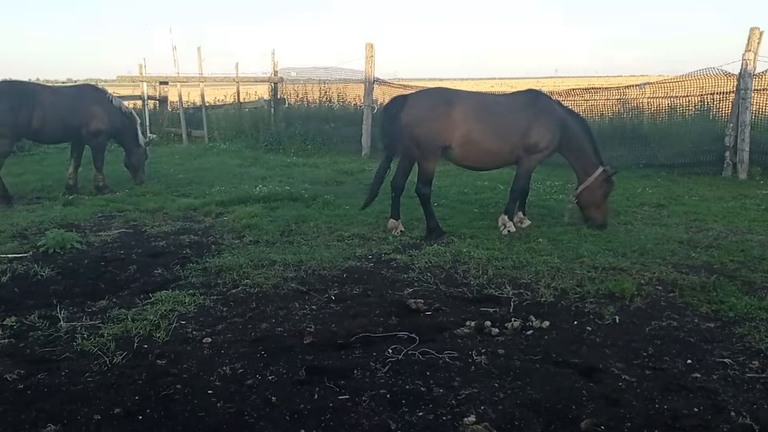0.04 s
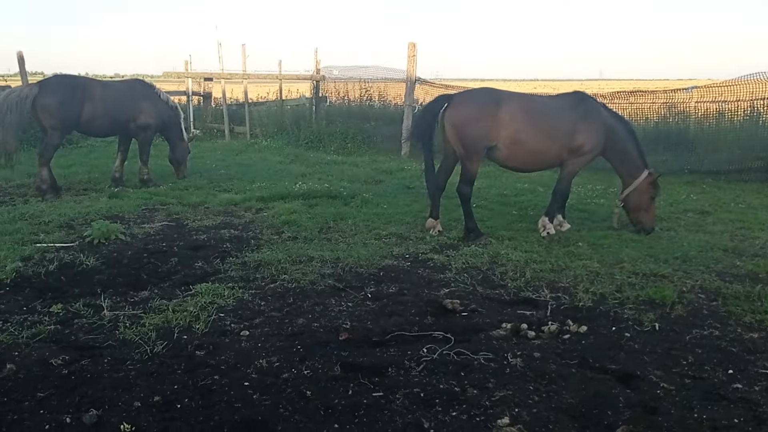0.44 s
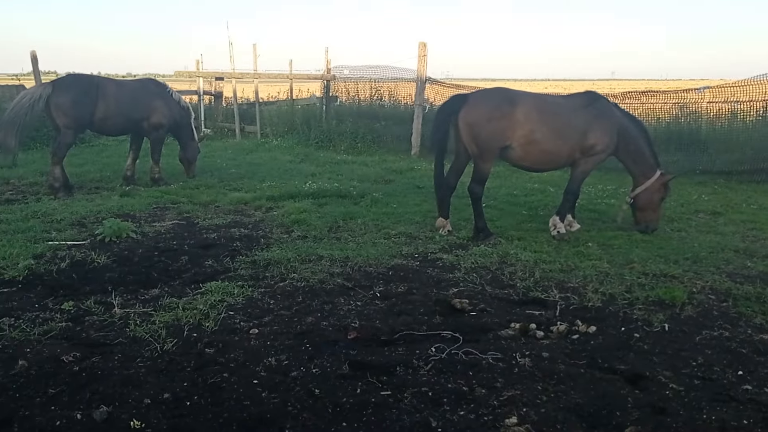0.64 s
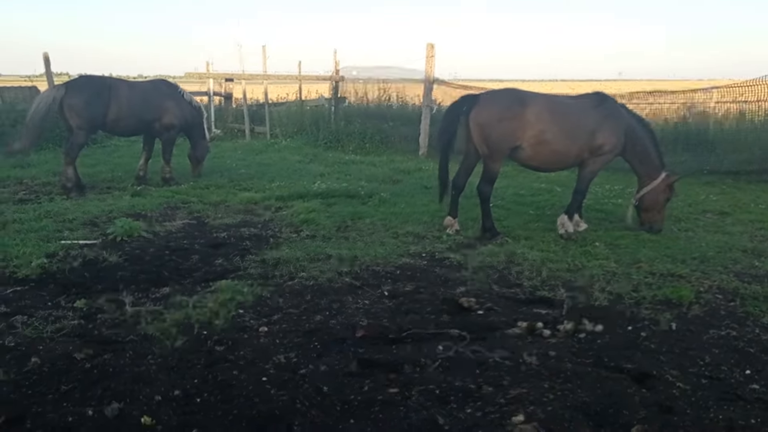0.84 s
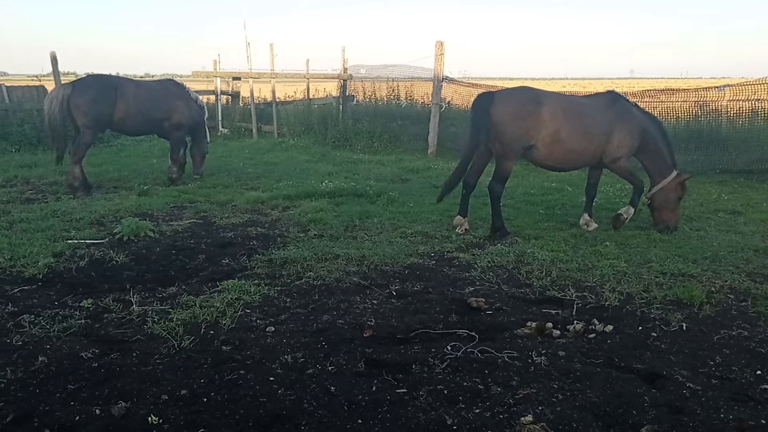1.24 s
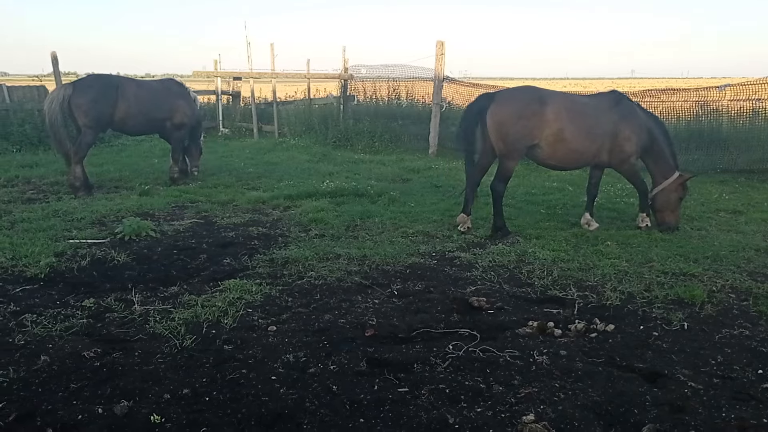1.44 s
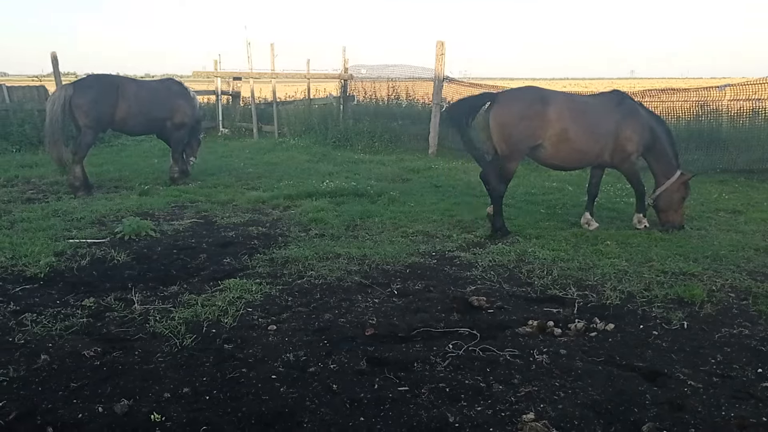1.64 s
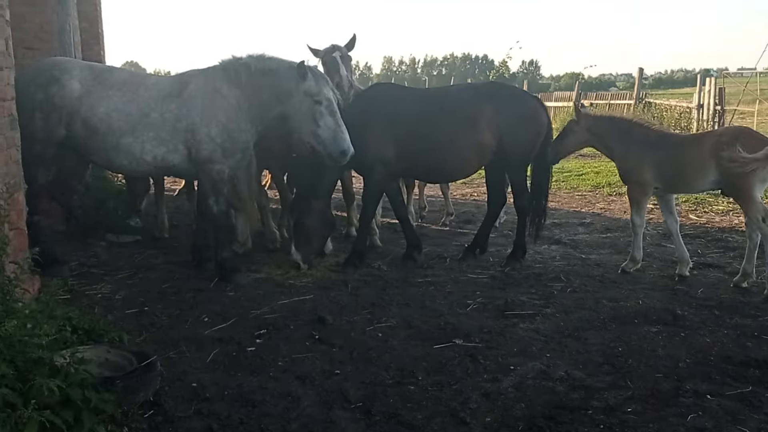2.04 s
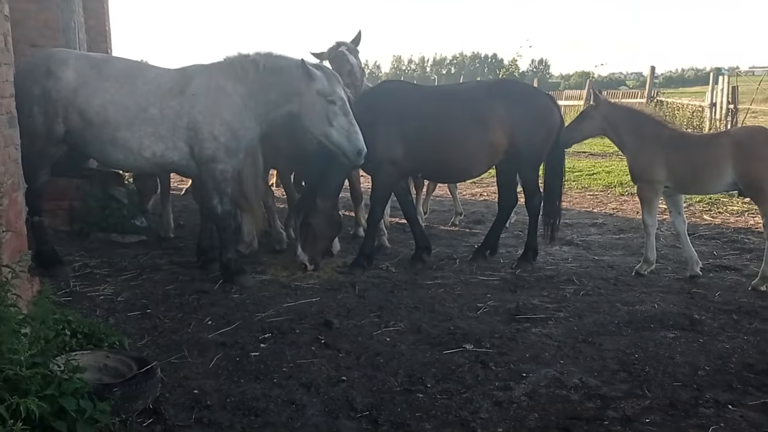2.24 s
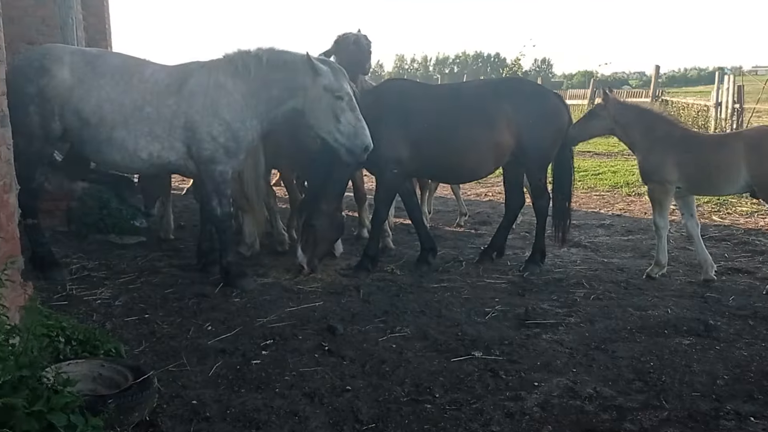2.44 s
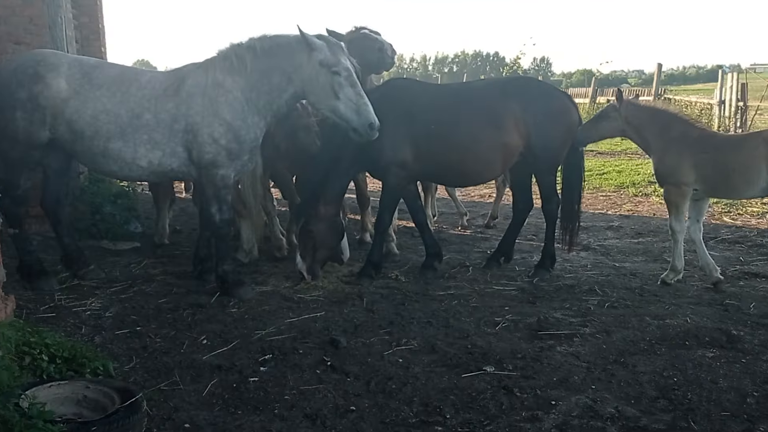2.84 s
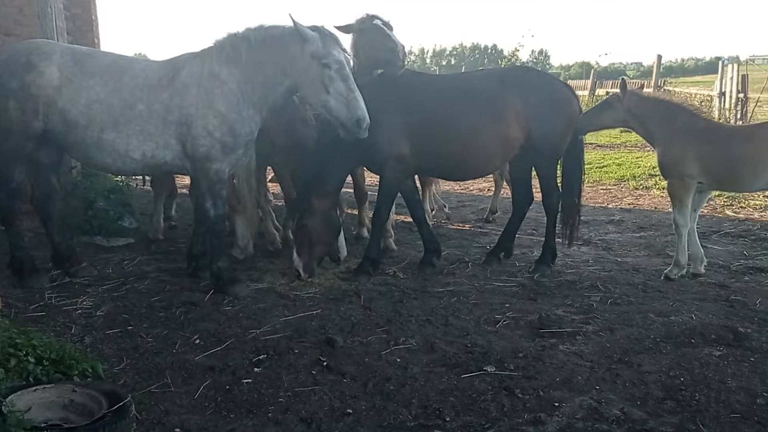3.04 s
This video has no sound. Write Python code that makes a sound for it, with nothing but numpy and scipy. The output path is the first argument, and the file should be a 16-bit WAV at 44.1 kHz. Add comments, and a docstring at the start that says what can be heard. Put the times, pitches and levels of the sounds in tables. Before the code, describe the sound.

A horse blows through its nose and gives one rough, fluttering snort close by in a yard. Before it come a few dry clicks, a small bird chirp and wind buffeting the microphone; afterwards a hoof thuds softly.

```python
"""A small bird chirps and dry clicks sound close by in a pasture, while wind buffets the microphone.
After a short silence, a horse in a yard blows through its nose and breaks into a rough snort:
the nostrils act as a valve that flutters ever more slowly, chopping the turbulent breath into
puffs that excite the resonances of the nose. Then straw rustles and a hoof thuds on soft earth."""
import sys
import numpy as np
from scipy import signal
from scipy.fft import rfft, irfft, next_fast_len
from scipy.io import wavfile
from scipy.ndimage import uniform_filter1d, map_coordinates

SR = 44100
rng = np.random.default_rng(int(sys.argv[2]) if len(sys.argv) > 2 else 0)


def put_to_file(sound):
    """Save the sound as 16-bit audio at rate SR, in the file named by the first command-line argument."""
    columns = np.atleast_2d(sound).T  # one column per channel
    safe = np.clip(columns, -1, 1)
    whole_steps = np.round(safe * 32767)
    wavfile.write(sys.argv[1], SR, whole_steps.astype(np.int16))


N = 136710
T = np.arange(N) / SR
PASTURE_END_S, YARD_START_S = 1.668, 1.770

# Flutter of the nostrils (time [s], flap rate [Hz])
FLAP_RATE = [(2.03, 24.6), (2.08, 23.94), (2.16, 21.8), (2.3, 21.07), (2.4, 18.4), (2.47, 15.3)]
# Envelopes of the nasal resonances, the hiss and the low flutter (time [s], level [dB])
NASAL_LEVEL = [(1.95, -67), (1.99, -51), (2.01, -41), (2.12, -37), (2.22, -41.5), (2.33, -45.5),
               (2.41, -43.5), (2.47, -53), (2.503, -53.5), (2.53, -60.5), (2.59, -84)]
HISS_LEVEL = [(1.97, -83), (2.01, -51.5), (2.18, -49.5), (2.39, -51), (2.44, -53.5), (2.47, -60),
              (2.498, -56), (2.52, -66), (2.58, -84.5)]
HEAD_LEVEL = [(1.97, -67), (2.01, -41.5), (2.12, -39.5), (2.28, -38), (2.4, -41.5), (2.47, -47),
              (2.508, -43), (2.535, -79), (2.56, -90)]
# Resonances of the nose, its narrow slit and its wet lips (frequency [Hz], bandwidth [Hz], gain [dB])
NOSE_MODES = [(577, 50, 1.5), (679, 97, 0), (806, 63, -3), (1042, 66, -10.5), (1387, 63, -17),
              (1760, 53, -24.5)]
SLIT_MODES = [(3310, 250, 1), (4630, 310, -5), (6120, 210, 0), (6460, 400, -7.5)]
LIP_MODES = [(1826, 620, -7), (2500, 360, -3), (3300, 410, -4.5)]
# Spectra of the hiss and of the deep chambers of the head (frequency [Hz], gain [dB])
HISS_SPECTRUM = [(880, -26), (1500, 1), (1640, -8.5), (1850, 0), (2190, -8.5), (2490, -1.5), (3090, -6),
                 (3350, -7), (4500, 1), (5330, -8), (6560, -0.5), (7170, -9), (8320, -12), (10900, -32),
                 (11900, -34), (13500, -53), (16000, -40)]
HEAD_SPECTRUM = [(30, -28), (60, -4), (95, -5.5), (135, 0.5), (185, -8), (255, -0.5), (300, -8.5),
                 (345, -22), (405, -12.5), (470, -16), (600, -26), (1200, -64)]


def snort():
    """Valve modulation of turbulent flow: each nostril flap lets out a long puff and a short rebound."""
    first_flap_s, rebound_phase = 2.012, 0.46
    cycles = np.cumsum(curve(FLAP_RATE)) / SR
    cycles -= np.interp(first_flap_s, T, cycles)
    # At first the strong blow holds the nostrils partly open.
    leak = 0.56 * np.exp(-np.maximum(T - first_flap_s, 0) / 0.13)

    def puff(phase, width):
        """A Gaussian pulse on every flap; phase and width in cycles."""
        return np.exp(-.5 * (((cycles - phase + .5) % 1 - .5) / width) ** 2)

    def ragged(flow, depth_db):
        """Flow plus leak under random amplitude modulation, at rms 1."""
        return unit((unit(flow) + leak) / (1 + leak) * amp(depth_db * wobble(330)))

    opening = puff(0, width=0.17)
    rebound = amp(-6) * puff(rebound_phase, width=0.081)
    # The resonances rise as the nostril opens and sag as it shuts.
    glide = .4 * puff(-.08, width=.15) - .18 * puff(.17, width=.1)
    nasal = bent(steadied(resonate(noise(), NOSE_MODES), span_s=0.0046), glide)
    nasal *= ragged(.45 + 0.64 * opening + rebound, depth_db=2.5)
    nasal = highpass(nasal, hz=443, order=8)

    hiss = patchy(coloured(noise(), HISS_SPECTRUM), depth_db=3.5)
    hiss *= ragged(0.37 + opening + .3 * rebound, depth_db=3.5)
    droplets = noise() * (rng.random(N) < 210 / SR)  # about 210 a second
    spit = coloured(droplets, HISS_SPECTRUM) * unit(opening + rebound)

    # A slit whistles as the nostril parts and again on the rebound.
    slit = 0.11 + puff(-0.093, width=0.054) + amp(0.5) * puff(rebound_phase, width=0.054)
    whistle = bent(resonate(noise(), SLIT_MODES), octaves=0.033 * wobble(60))
    whistle = lowpass(whistle * ragged(slit, depth_db=1), hz=7800, order=10)
    splutter = bent(resonate(noise(), LIP_MODES), octaves=.4 * glide)
    splutter *= ragged(0.16 + puff(0.13, width=0.12), depth_db=2)
    treble = hiss + amp(-8) * spit + amp(-4) * whistle + amp(-5) * splutter

    head = steadied(coloured(noise(), HEAD_SPECTRUM), span_s=0.019)
    head *= unit(0.78 + leak + opening + .5 * rebound)
    # Each of eleven flaps adds a slap: one brief push of air.
    flap_times = np.interp(np.arange(11), cycles, T)[:, None]
    slap_lag_s, slap_width_s = 0.00543, .0016
    offset = (T - flap_times - slap_lag_s) / slap_width_s
    slaps = ((offset ** 2 - 1) * np.exp(-.5 * offset ** 2)).sum(axis=0) / (1 + leak)
    bass = head + amp(11) * slaps
    return level(NASAL_LEVEL) * nasal + level(HISS_LEVEL) * treble + level(HEAD_LEVEL) * bass


# Envelopes of the smooth breath and of its hollow hum (time [s], level [dB])
BREATH_LEVEL = [(1.845, -90), (1.872, -52), (1.9, -56.5), (1.932, -62), (1.96, -55), (2.0, -54.5),
                (2.04, -84)]
HUM_LEVEL = [(1.866, -71), (1.88, -45.5), (1.925, -47.5), (1.96, -45), (2.0, -51), (2.03, -86)]
# Resonances of the open nose (frequency [Hz], bandwidth [Hz], gain [dB])
OPEN_NOSE_MODES = [(593, 120, -6), (883, 77, -2.5), (1008, 45, 1.5), (1630, 80, -13), (1873, 22, -5),
                   (2810, 87, -11.5), (3644, 62, -7), (4320, 110, -11.5), (5420, 130, -27),
                   (5900, 39, -15.5), (7460, 80, -14.5)]
# Spectrum of the hum (frequency [Hz], gain [dB])
HUM_SPECTRUM = [(60, -37), (120, -7), (170, 1.5), (280, -1), (335, -27), (420, -16.5), (700, -69)]


def blow():
    """Source and filter: streaming air excites the wavering open nose just before the flutter."""
    air = lowpass(noise(), hz=8500, order=8)
    stream = bent(resonate(air, OPEN_NOSE_MODES), octaves=0.039 * wobble(25))
    stream = patchy(stream, depth_db=3)
    hum = steadied(coloured(noise(), HUM_SPECTRUM), span_s=0.026)
    return level(BREATH_LEVEL) * stream + level(HUM_LEVEL) * hum


# Spectrum of a hoof on soft earth (frequency [Hz], gain [dB])
THUD_SPECTRUM = [(29, -40), (50, -9), (130, 2.5), (273, -15), (404, -21.5), (749, -25), (844, -35),
                 (1020, -29), (3000, -75), (3900, -86), (6600, -120)]


def hoof():
    """Damped impact: soft earth gives a dull thud with a gradual attack and an exponential decay."""
    step_s, attack_s, t60_s = 2.781, 0.011, 0.13
    age = np.maximum(T - step_s, 0)
    envelope = amp(-30.5 - 60 * age / t60_s) * (1 - np.exp(-age / attack_s))
    return envelope * steadied(coloured(noise(), THUD_SPECTRUM), span_s=0.017)


# Dry snaps (time [s], relative level [dB], high-pass cutoff [Hz], 60 dB decay time of the crackle [s])
SNAPS = [(0.1475, -38.5, 3000, 0.0061), (0.215, -25.5, 5600, 0.0053), (0.2336, -18, 244, 0.0013),
         (.480, -24, 4060, 0.009), (1.029, -66, 2530, .012), (1.599, -61, 3000, 0.054)]
# Modes of a small hard body (frequency [Hz], bandwidth [Hz], gain [dB])
HARD_BODY_MODES = [(422, 68, 7.5), (1000, 260, -5.5), (2110, 560, -2.5), (2693, 280, 2), (4700, 1300, -11),
                   (6070, 530, -3), (7710, 1300, -15), (12000, 2200, -28.5), (15400, 900, -18.5)]


def clicks():
    """Impulse excitation: each snap and its brief crackle ring the same small hard body."""
    taps = np.zeros(N)
    for start, db, cutoff_hz, t60 in SNAPS:
        snap = amp(-30.5 - 60 * np.abs(T - start) / t60) * noise() * (T >= start)
        snap[round(start * SR)] = 1  # the impulse ahead of the crackle
        low_cut = signal.butter(2, cutoff_hz, "high", fs=SR, output="sos")
        taps += amp(db) * signal.sosfilt(low_cut, snap)
    return amp(-1) * np.std(taps) * resonate(taps, HARD_BODY_MODES)


# Bird notes (time [s], duration [s], start frequency [Hz], end frequency [Hz], level [dB])
BIRD_NOTES = [(0.113, .02, 6030, 6100, -65.5), (0.174, 0.062, 6860, 4290, -51),
              (1.3, 0.11, 1977, 1965, -79.5)]


def bird():
    """Frequency modulation of a pure tone: thin whistles, the loudest falling ever faster."""
    out = np.zeros(N)
    for start, duration, start_hz, end_hz, db in BIRD_NOTES:
        progress = np.clip((T - start) / duration, 0, 1)
        hz = start_hz + (end_hz - start_hz) * progress ** 1.35
        hz *= 1 + 0.016 * wobble(500)
        envelope = amp(db + 2 * wobble(200)) * np.abs(np.sin(np.pi * progress)) ** 0.42
        out += envelope * np.sin(2 * np.pi * np.cumsum(hz) / SR)
    return out


# Swishes of grass and straw (time [s], duration [s], level [dB], centre frequency [Hz])
SWISHES = [(0.207, 0.047, -63, 4470), (.57, 0.27, -83.5, 5500), (0.986, 0.087, -83, 4460),
           (1.164, 0.077, -81.5, 4660), (1.535, .014, -72.5, 6000), (1.592, 0.02, -58.5, 1700),
           (1.594, 0.013, -64.5, 6000), (1.791, 0.054, -62, 800), (2.612, .05, -68, 5580),
           (2.642, 0.18, -68, 4140), (2.911, 0.11, -78.5, 6170), (2.907, 0.064, -69.5, 456),
           (3.033, 0.012, -74.5, 7000)]


def rustles():
    """Friction noise: grass and straw give grainy, band-limited swells as the horses shift."""
    out = np.zeros(N)
    for start, duration, db, hz in SWISHES:
        spectrum = [(hz / 8, -18), (hz / 2, -5), (hz, 0), (hz * 1.57, -5), (hz * 2.24, -24), (hz * 4, -40)]
        progress = np.clip((T - start) / duration, 0, 1)
        swell = np.abs(np.sin(np.pi * progress)) ** 0.53
        grains = noise() * amp(1.95 * wobble(300))
        out += amp(db) * swell * coloured(grains, spectrum)
    return np.std(out) * patchy(out, depth_db=4.5)


# Gusts in each place (time [s], level [dB])
PASTURE_GUSTS = [(0, -57.5), (.06, -68.5), (.16, -65), (.26, -50), (.43, -51), (.53, -37.5), (.6, -35),
                 (.7, -38), (.77, -45), (.82, -39.5), (.88, -50), (.98, -42), (1.13, -39), (1.2, -58.5),
                 (1.25, -48), (1.32, -58.5), (1.365, -41.5), (1.41, -57), (1.53, -40), (1.57, -51.5),
                 (1.61, -40), (1.66, -44.5)]
YARD_GUSTS = [(1.77, -46.5), (1.85, -66.5), (2.55, -63), (2.63, -56), (2.69, -65), (2.87, -64.5),
              (3.1, -66.5)]
# Spectra of the buffeting and of each place's hush (frequency [Hz], gain [dB])
BUFFET_SPECTRUM = [(15, -49.5), (25, -25), (66, 2.5), (118, 5), (179, -2.5), (230, -7.5), (325, -23.5),
                   (367, -26), (479, -42), (600, -58.5), (780, -78.5), (1320, -120)]
PASTURE_HUSH = [(290, -8.5), (500, -5.5), (900, -5.5), (1900, -11.5), (2200, -19.5), (4400, -22),
                (7000, -26.5), (9600, -41.5), (13500, -45.5), (15200, -29.5), (16000, -32)]
YARD_HUSH = [(180, -32), (300, -4.5), (398, -7.5), (749, -8), (1250, -15), (1360, -15), (3640, -26.5),
             (4990, -30), (7440, -29), (11900, -61), (16000, -40.5)]


def wind():
    """Turbulent pressure on the microphone: lumpy low buffeting over the faint hush of each place."""
    in_pasture = T < PASTURE_END_S
    gust_db = np.where(in_pasture, curve(PASTURE_GUSTS), curve(YARD_GUSTS)) + wobble(60)
    buffet = amp(gust_db) * steadied(coloured(noise(), BUFFET_SPECTRUM), span_s=.045)
    pasture = amp(-74) * patchy(coloured(noise(), PASTURE_HUSH), depth_db=3.56)
    yard = amp(-69) * patchy(coloured(noise(), YARD_HUSH), depth_db=3.56)
    return buffet + np.where(in_pasture, pasture, yard) * amp(0.74 * wobble(16))


# Outdoor reverberation (frequency [Hz], 60 dB decay time [s])
REVERB_TIME = [(200, 0.14), (2000, 0.37), (10000, 0.19)]


def echo(x):
    """Diffuse reflection from sheds, fences and ground: each band decays exponentially."""
    hz, t, bands = signal.stft(rng.standard_normal(SR // 2), SR, nperseg=256)
    decay = amp(-60 * t / along(REVERB_TIME, hz)[:, None])
    tail = signal.istft(bands * decay, SR, nperseg=256)[1]
    return signal.fftconvolve(x, tail / np.linalg.norm(tail))[:N]


def amp(db):
    """Decibels to gain."""
    return 10 ** (np.asarray(db) / 20)


def unit(x):
    """Normalisation to rms 1."""
    return x / np.sqrt(np.mean(x ** 2) + 1e-20)


def along(points, hz):
    """Interpolation of (frequency [Hz], value) points on a logarithmic axis."""
    knots_hz, values = np.transpose(points)
    return np.interp(np.log(hz + 1), np.log(knots_hz + 1), values)


def curve(rows, outside=None):
    """Linear interpolation of (time [s], value) rows at every sample."""
    return np.interp(T, *np.transpose(rows), left=outside, right=outside)


def level(rows):
    """Gain envelope from (time [s], level [dB]) rows, silent outside them."""
    return amp(curve(rows, outside=-140))


def noise():
    """White Gaussian noise."""
    return rng.standard_normal(N)


def wobble(rate):
    """Smooth random modulation, rate knots a second."""
    return map_coordinates(rng.standard_normal(4000), [T * rate], mode="wrap")


def filtered(x, response):
    """Linear filtering: the spectrum of x times a frequency response."""
    size = next_fast_len(N + SR // 2)
    return irfft(rfft(x, size) * response(np.fft.rfftfreq(size, 1 / SR)), size)[:N]


def lowpass(x, hz, order):
    """Zero-phase roll-off above hz."""
    return filtered(x, lambda f: 1 / (1 + (f / hz) ** order))


def highpass(x, hz, order):
    """The complement of the low-pass."""
    return x - lowpass(x, hz, order)


def coloured(x, spectrum):
    """Spectral shaping by (frequency [Hz], gain [dB]) points, at rms 1."""
    return unit(filtered(x, lambda hz: amp(along(spectrum, hz))))


def resonate(x, modes):
    """Modal superposition: damped resonators in parallel with alternating signs, at rms 1."""
    def response(f):
        return sum((-1) ** k * amp(db) * 1j * f * width / (hz * hz - f * f + 1j * f * width)
                   for k, (hz, width, db) in enumerate(modes))
    return unit(filtered(x, response))


def steadied(x, span_s):
    """Division by the running rms evens out the slow chance swells of noise."""
    power = uniform_filter1d(x * x, max(8, int(span_s * SR)))
    return x / np.sqrt(np.abs(power) + 1e-6)


def patchy(x, depth_db):
    """Random gain in brief patches of time and frequency, at rms 1."""
    bands = signal.stft(x, nperseg=512)[2]
    field = uniform_filter1d(rng.standard_normal(bands.shape), size=4, axis=0)
    field = uniform_filter1d(field, size=6, axis=1)
    return unit(signal.istft(bands * amp(depth_db * unit(field)), nperseg=512)[1][:N])


def bent(x, octaves):
    """Variable-rate resampling: resonances glide by a curve in octaves."""
    return map_coordinates(x, [np.cumsum(2 ** octaves)], mode="wrap")


def scene():
    """Direct plus reflected sound: the horse and clicks are almost dry, the bird is farther off."""
    horse = snort() + blow() + hoof()
    chirps, snaps = bird(), clicks()
    echo_send = amp(-19) * horse + amp(-6.5) * chirps + amp(-21) * snaps
    return (horse + chirps + snaps + rustles() + wind() + echo(echo_send))[None]


def record(dry):
    """Band limiting by the microphone, with a short silence between pasture and yard."""
    audible = (T < PASTURE_END_S) | (T > YARD_START_S)
    thinned = highpass(dry[0], hz=44.4, order=4)
    return filtered(thinned * audible, lambda hz: hz < 16100)[None]


dry = scene()
out = record(dry)
put_to_file(out)
```